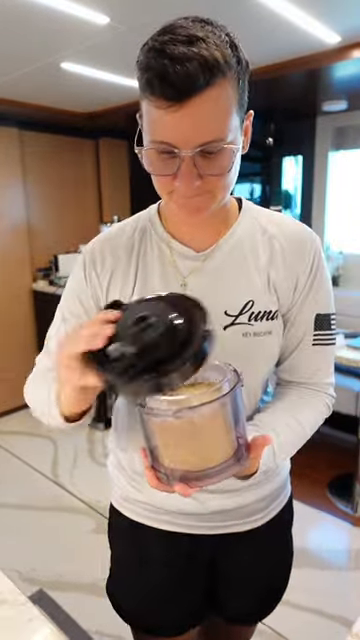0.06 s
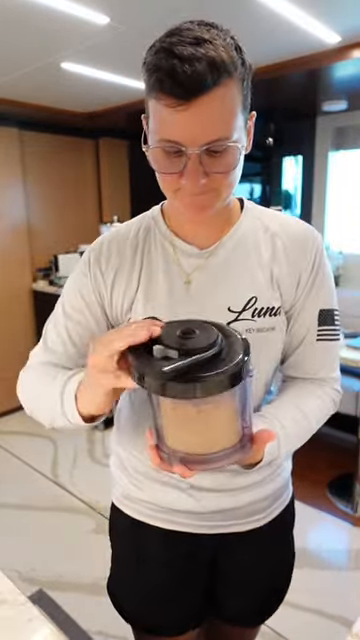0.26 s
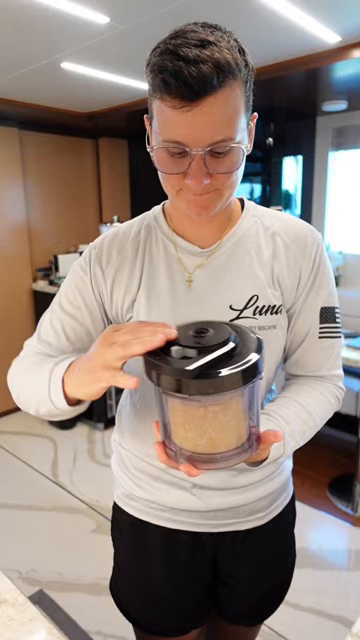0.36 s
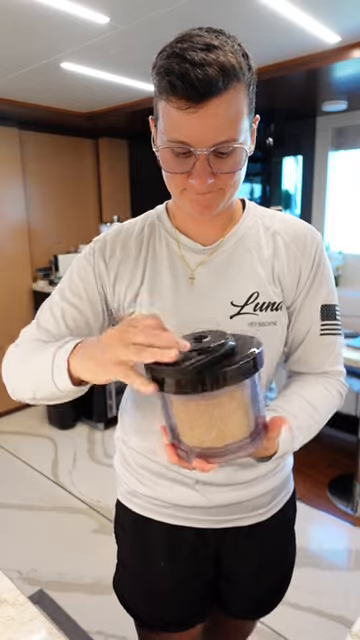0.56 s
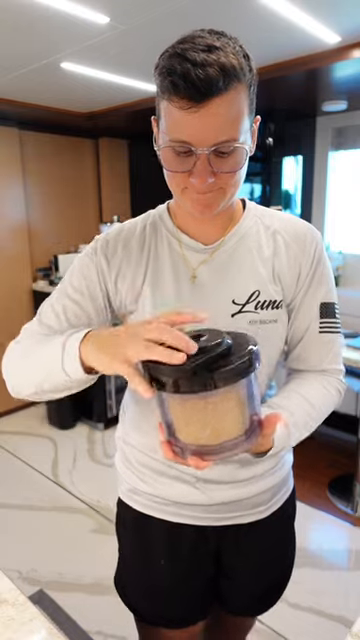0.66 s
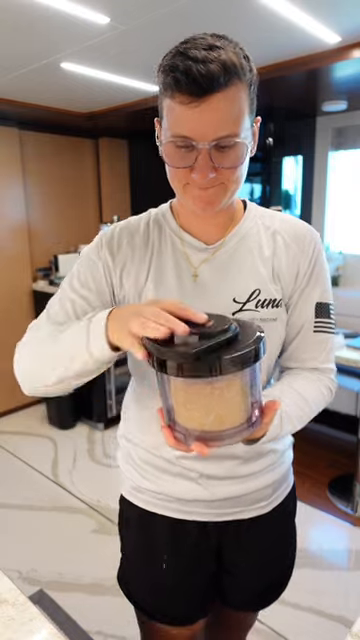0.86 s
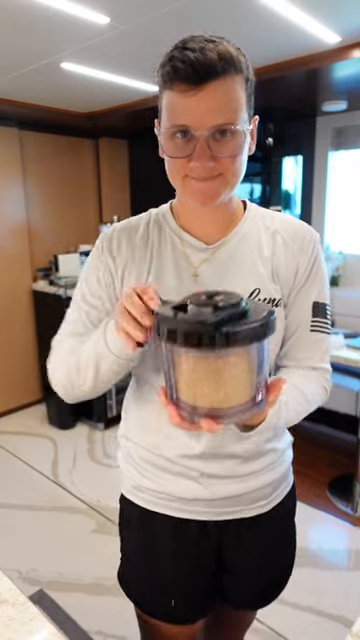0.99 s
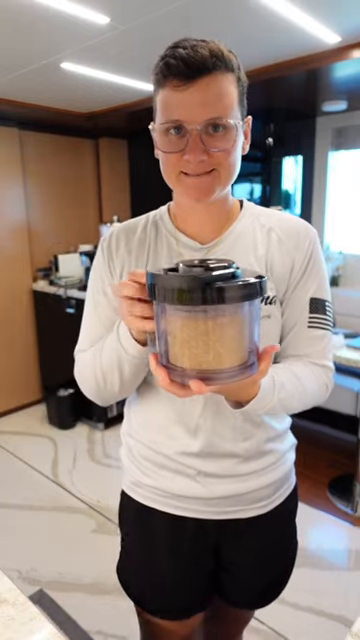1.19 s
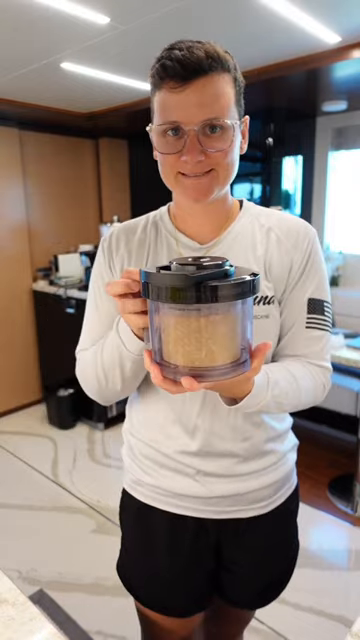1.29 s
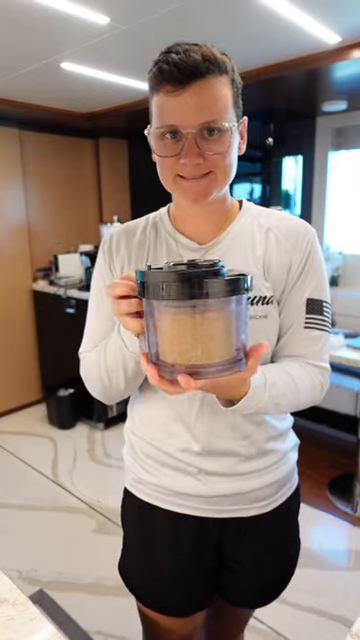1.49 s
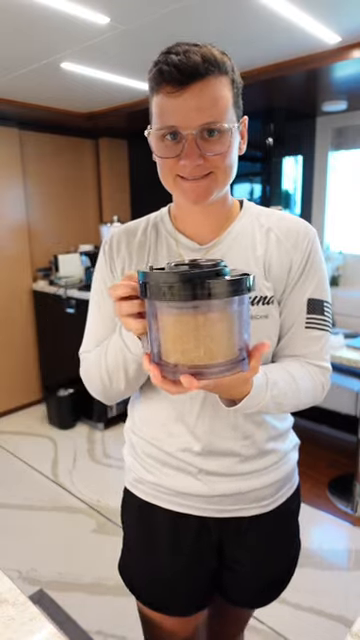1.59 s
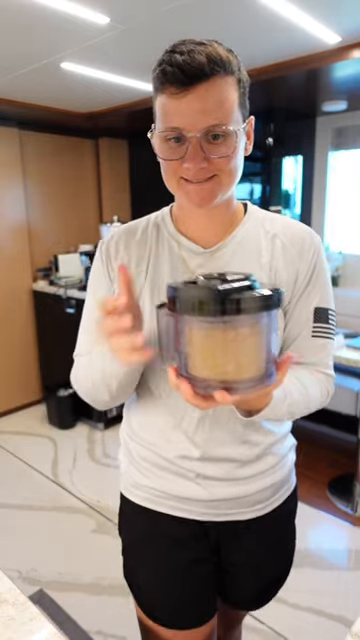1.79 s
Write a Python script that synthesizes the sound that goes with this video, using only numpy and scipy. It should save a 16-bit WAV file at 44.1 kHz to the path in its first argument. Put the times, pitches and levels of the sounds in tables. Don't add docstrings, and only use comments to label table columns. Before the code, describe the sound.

Hard plastic lid clacks onto a bowl, rattles, clicks, then snaps locked in a small humming room

```python
import sys
import numpy as np
from scipy import signal
from scipy.fft import rfft, irfft
from scipy.io import wavfile
from scipy.ndimage import uniform_filter1d, minimum_filter1d

SR = 44100
rng = np.random.default_rng(int(sys.argv[2]) if len(sys.argv) > 2 else 0)


def to_wav(sig):
    pcm = np.clip(np.atleast_2d(sig), -1, 1) * 32767
    pcm = np.round(pcm).astype(np.int16)
    wavfile.write(sys.argv[1], SR, pcm.T)


def volts_from_db(level):
    exponent = np.asarray(level, float) / 20
    return 10 ** exponent


N = 81585

# pitch_hz, level_db (per Hz)
VENT_COLOUR = [(12, -77), (20, -63), (96, -7), (189, -12), (370, -4.5), (425, -14), (518, -12.5),
               (811, -21.5), (16300, -53.5)]
# pitch_hz, width_hz, level_db
FAN_TONES = [(106.5, 46, -49.5), (226, 10, -55.5), (343, 47, -51), (477.6, 190, -45)]
# pitch_hz, side_level_db
VENT_WIDTH = [(60, -28), (110, -27), (200, -16.5), (380, -22.5), (700, -9.5), (1290, -6), (2380, -6),
              (4400, -5), (8120, -3), (15000, -10)]
# pitch_hz, level_db
MIC_RESPONSE = [(20, -14), (45, 2), (70, 2), (9000, 0.5), (14000, -1.5)]

# pitch_hz, level_db (per Hz)
DULL_CRACK = [(150, -40), (300, -19), (600, 1.5), (1300, 0), (4700, -7.5), (5600, -13), (11000, -21.5),
              (16000, -36)]
BRIGHT_CRACK = [(150, -43), (330, -19), (600, -4.5), (1200, -2.5), (4000, -2), (7000, -4), (12600, -3.5),
                (16000, -7.5)]

# start_s, crack_level_db, ring_level_db, brightness (0-1), pitch_factor
LID_SEATS = [
    (.175, -52, -63, 0.24, 0.71),
    (.2350, -7, -11.5, 0.09, 0.95),
    (.2445, -29, -17, 0.6, 1.02),
    (.2615, -24, -21, 0.6, 0.99),
    (.2860, -6, -15, 0.04, .98),
    (.3235, -12.5, -21.5, 0.05, 0.78),
    (.3450, -21, -26.5, 0, .9),
]
# start_s, crack_level_db, ring_level_db, brightness (0-1), pitch_factor
RIM_CLICKS = [
    (.4298, -18.5, -21, .9, 1.8),
    (.4405, -2, -4, 0.44, 1.0),
    (.4500, -9.5, -12, 0.81, 1.02),
    (.6835, -42, -60, 0.48, 1.9),
    (.8503, -22, -25, 0.92, 0.661),
    (.9800, -52, -43, 0.29, 1.3),
    (1.2470, -76, -70, 0.65, 1.1),
    (1.3480, -74, -73, .3, 1.1),
    (1.3910, -43, -58, 0.28, 1.0),
    (1.6800, -44, -57, 0.48, 0.89),
]
# start_s, crack_level_db, ring_level_db, brightness, pitch_factor
LATCH_CATCHES = [
    (.8170, -26.5, -12.5, -0.1, 1.0),
    (.8385, -53, -25, -0.27, 0.92),
]
# start_s, crack_level_db, ring_level_db, brightness (0-1), pitch_factor
LATCH_LOCKS = [
    (1.4345, -1, -2.5, 0.93, 1.0),
    (1.5000, -17, -27, 0.52, 1.02),
    (1.5300, -25.5, -27, .6, 1.14),
]
# start_s, level_db, pitch_hz, rise_s, crack_level_db
BOWL_KNOCKS = [
    (.4108, -11, 711, 0.0054, -24.5),
    (0.8178, -20.5, 504, 0.0047, -25),
    (0.9066, -15, 361.2, 0.017, -30),
    (.9470, -27.5, 365.3, 0.0091, -68),
    (1.3942, -23.5, 380, 0.0009, -44.5),
    (1.4184, -11.5, 360.7, 0.012, -34),
    (1.4200, -17.5, 640, 0.0017, -20.5),
    (1.4240, -7.5, 469, 0.0074, -53),
]

# pitch_hz, level_db, t60_s
LID_MODES = [(515, -0.5, 0.018), (700, -0.5, 0.05), (872, 4, 0.061), (853, 0, 0.081), (925, -7.5, 0.062),
             (1062, 0.5, 0.058), (1100, -16, .04), (1600, -8, 0.022), (2040, -5, 0.023),
             (2470, -0.5, 0.022), (3070, 4, .012), (4770, -1, 0.019), (6100, -16, 0.033)]
RIM_MODES = [(385, 1.5, 0.024), (640, -5.5, 0.022), (1002, -5.5, 0.033), (1124, -1.5, 0.065),
             (1370, -8.5, 0.026), (1858, -3.5, 0.041), (2060, -3, 0.041), (2342, -1, 0.027),
             (3266, -1.5, 0.012), (4147, -1, 0.018)]
LATCH_MODES = [(663, -4, 0.064), (990, -26, 0.043), (1147, -0.5, 0.059), (1470, -12, 0.039),
               (1870, -22.5, 0.038), (2097, -15.5, 0.082), (2710, -25, 0.013), (3430, -13, 0.011)]
LOCKED_MODES = [(702, -11.5, 0.084), (847, -6, 0.034), (1047, -2, 0.045), (1151.4, 1, 0.065),
                (1222, -8.5, 0.049), (1502, -16, 0.045), (1674, -21, 0.026), (1852, -6, 0.076),
                (3390, -1.5, 0.0092), (4330, -14, 0.0086)]

# pitch_hz, t60_s
ROOM_DECAY = [(250, 0.37), (700, 0.27), (1500, 0.28), (4000, 0.28), (9000, 0.29), (13000, 0.24),
              (16000, 0.17)]
# pitch_hz, side_level_db
ROOM_WIDTH = [(200, -40), (500, -15), (1500, -8.5), (5000, -9.5), (9000, -8), (13000, -15), (15000, -19)]


def evened(x):
    return x / np.sqrt(np.mean(x ** 2) + 1e-20)


def read(points, hz):
    f, value = np.transpose(points)
    return np.interp(np.log(hz + 1), np.log(f + 1), value)


def add(mix, start_s, sound):
    part = mix[round(start_s * SR):][:len(sound)]
    part += sound[:len(part)]


def coloured(x, *tables):
    hz = np.fft.rfftfreq(len(x), 1 / SR)
    level_db = sum(read(table, hz) for table in tables)
    return irfft(rfft(x) * volts_from_db(level_db), len(x))


def ventilation():
    level_db, swell_db = -42.5, 0.7
    hz = np.fft.rfftfreq(N, 1 / SR)
    pair = []
    for noise in rng.standard_normal((2, N)):
        air = volts_from_db(level_db) * evened(coloured(noise, VENT_COLOUR, MIC_RESPONSE))
        for pitch_hz, width_hz, tone_db in FAN_TONES:
            resonance = 1 / (1 + (2 * (hz - pitch_hz) / width_hz) ** 2)
            tone = irfft(rfft(rng.standard_normal(N)) * resonance, N)
            air = air + volts_from_db(tone_db) * evened(tone)
        pair.append(air)
    drift = uniform_filter1d(rng.standard_normal(N), size=5000)
    swell = evened(uniform_filter1d(drift, size=5000))
    return volts_from_db(swell_db * swell) * np.array([pair[0], coloured(pair[1], VENT_WIDTH)])


def crack(level_db, brightness):
    t60_s, rise_s = 0.033, 0.0009
    t, hz = np.arange(2048) / SR, np.fft.rfftfreq(2048, 1 / SR)
    share = np.clip(brightness, -1, 1)
    colour = volts_from_db((1 - share) * read(DULL_CRACK, hz) + share * read(BRIGHT_CRACK, hz))
    shape = volts_from_db(-60 * t / t60_s) * np.minimum(t / rise_s, 1)
    burst = shape * rng.standard_normal(2048)
    for _ in range(6):
        z = rfft(burst)
        flat = irfft(colour * z / (abs(z) + 1e-12))
        burst = shape * flat / np.sqrt(uniform_filter1d(flat ** 2, size=48) + 1e-20)
    return volts_from_db(level_db) * burst


def ring(modes, level_db, pitch_factor):
    spread_db, detune_share, rise_s = 2.0, 0.005, 0.0011
    t = np.arange(5000) / SR
    hz, mode_db, t60_s = np.transpose(modes)[:, :, None]
    spot, detune = rng.standard_normal((2, len(modes), 1))
    hz = hz * pitch_factor * (1 + detune_share * detune)
    fading = volts_from_db(level_db + mode_db + spread_db * spot - 60 * t / t60_s)
    body = (fading * np.sin(2 * np.pi * hz * t)).sum(0)
    return body * np.minimum(t / rise_s, 1)


def touch(dry, send, row, modes, muffled_db=0):
    ring_send_db = -3.5
    start_s, crack_db, ring_db, brightness, pitch_factor = row
    tick = crack(crack_db, brightness)
    body = ring(modes, ring_db, pitch_factor)
    add(dry, start_s, tick)
    add(dry, start_s, body)
    add(send, start_s, volts_from_db(muffled_db) * tick)
    add(send, start_s, volts_from_db(muffled_db + ring_send_db) * body)


def seat_lid(dry, send):
    for i, row in enumerate(LID_SEATS):
        touch(dry, send, row, LID_MODES, muffled_db=-5.0 if i > 1 else 0)


def room(send):
    level_db, build_s = 2, 0.0017
    late_t60_s, late_db = 0.77, -24
    taps = np.zeros((2, SR))
    at = np.arange(40, SR - 12, 12) + rng.integers(0, 12, (2, (SR - 41) // 12))
    np.put_along_axis(taps, at, rng.choice([-1., 1.], at.shape), 1)
    hz, t, z = signal.stft(taps, SR, nperseg=256)
    early = volts_from_db(-60 * t / read(ROOM_DECAY, hz)[:, None])
    late = volts_from_db(late_db - 60 * t / late_t60_s)
    tail = signal.istft(z * (early + late), SR, nperseg=256)[1][:, :SR]
    tail = tail * (1 - np.exp(-np.arange(SR) / SR / build_s))
    tail = tail / np.linalg.norm(tail[0])
    mid, side = signal.fftconvolve(send[None], tail, axes=1)[:, :N]
    return volts_from_db(level_db) * np.array([mid, coloured(side, ROOM_WIDTH)])


def knock_bowl(dry, send):
    t60_s, overtone_ratio, overtone_db = 0.056, 1.8, -19
    room_send_db, brightness = -10.5, -0.21
    t = np.arange(5000) / SR
    for start_s, level_db, pitch_hz, rise_s, crack_db in BOWL_KNOCKS:
        tone = np.sin(2 * np.pi * pitch_hz * t)
        tone += volts_from_db(overtone_db) * np.sin(2 * np.pi * overtone_ratio * pitch_hz * t)
        swell = np.sin(np.pi / 2 * np.minimum(t / rise_s, 1))
        fading = volts_from_db(level_db - 60 * np.maximum(t - rise_s, 0) / t60_s)
        knock = tone * swell * fading
        tick = crack(crack_db, brightness)
        add(dry, start_s, knock)
        add(dry, start_s, tick)
        add(send, start_s, volts_from_db(room_send_db) * knock)
        add(send, start_s, tick)


def turn_rim(dry, send):
    for row in RIM_CLICKS:
        touch(dry, send, row, RIM_MODES)


def catch_latch(dry, send):
    for row in LATCH_CATCHES:
        touch(dry, send, row, LATCH_MODES)


def push_hand(dry):
    start_s, level_db, length_s = 1.4240, -33.5, 0.005
    add(dry, start_s, volts_from_db(level_db) * np.hanning(int(length_s * SR)))


def lock_latch(dry, send):
    for row in LATCH_LOCKS:
        touch(dry, send, row, LOCKED_MODES)


def scene():
    dry, send = np.zeros((2, N))
    seat_lid(dry, send)
    turn_rim(dry, send)
    catch_latch(dry, send)
    lock_latch(dry, send)
    knock_bowl(dry, send)
    small = signal.butter(4, 270, "high", fs=SR, output="sos")
    dry, send = signal.sosfilt(small, [dry, send])
    push_hand(dry)
    mid, side = room(send) + ventilation()
    return np.array([mid + dry + side, mid + dry - side])


def limiter(x):
    threshold_db, recover_db_per_s = -14.5, 304
    slow_duck_db, slow_db_per_s = 3.5, 3
    ahead, sense = int(0.0025 * SR), int(0.0008 * SR)
    power = uniform_filter1d((x ** 2).mean(0), sense)
    power_db = 10 * np.log10(abs(power) + 1e-12)
    power_db = -minimum_filter1d(-power_db, 2 * ahead + 1)
    fall = np.arange(N) * recover_db_per_s / SR
    peak_db = np.maximum.accumulate(power_db + fall) - fall
    over_db = np.maximum(peak_db - threshold_db, 0)
    sink = np.arange(N) * slow_db_per_s / SR
    slow_db = np.maximum.accumulate(np.minimum(over_db, slow_duck_db) + sink) - sink
    cut_db = np.maximum(over_db, slow_db)
    return x / volts_from_db(uniform_filter1d(cut_db, ahead))


def low_pass(x):
    return signal.sosfilt(signal.butter(12, 16460, fs=SR, output="sos"), x)


def record(dry):
    held = limiter(dry)
    band_limit = signal.firwin(255, 15700, fs=SR)
    mix = signal.oaconvolve(held, band_limit[None], "same")
    return low_pass(mix)


dry = scene()
out = record(dry)
to_wav(out)
```